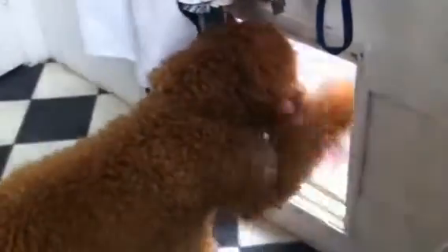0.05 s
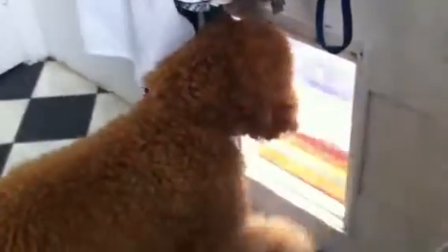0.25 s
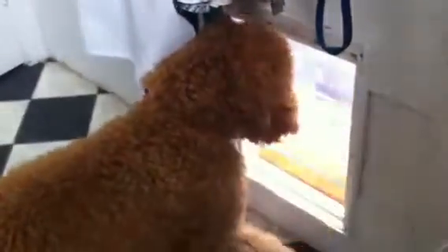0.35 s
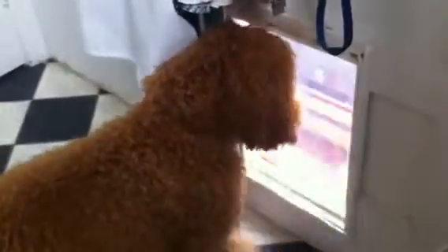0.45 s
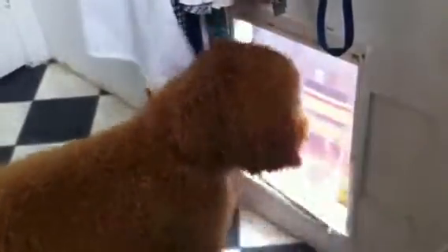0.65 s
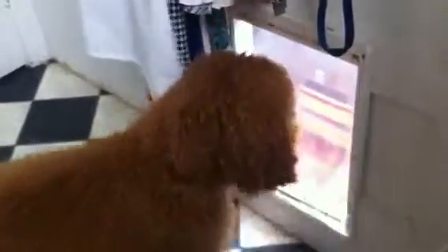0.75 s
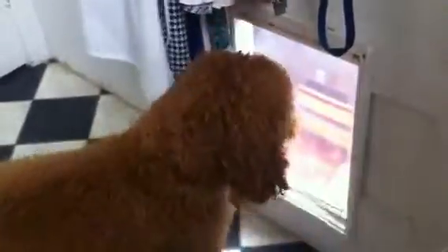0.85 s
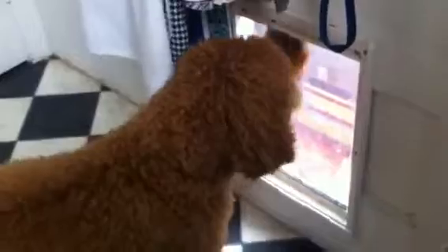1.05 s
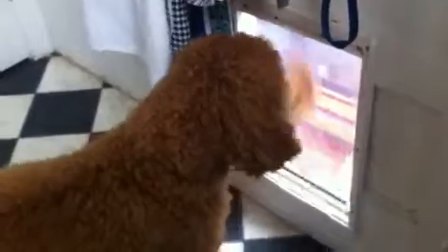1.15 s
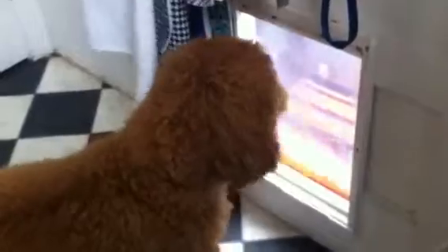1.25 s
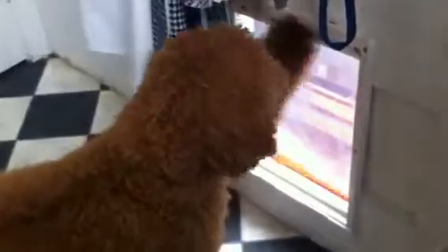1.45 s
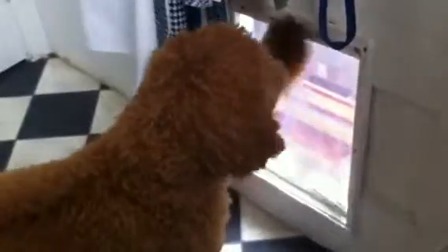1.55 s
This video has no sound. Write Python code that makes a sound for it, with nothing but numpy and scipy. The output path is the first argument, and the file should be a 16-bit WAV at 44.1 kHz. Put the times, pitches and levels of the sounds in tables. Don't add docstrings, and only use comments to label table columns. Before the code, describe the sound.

Sharp scratchy paw knocks on a thin plastic pet flap, with soft thumps and loose rattles indoors

```python
import sys
import numpy as np
from scipy import signal
from scipy.fft import rfft, irfft, next_fast_len
from scipy.io import wavfile
from scipy.ndimage import uniform_filter1d

SR = 44100
rng = np.random.default_rng(int(sys.argv[2]) if len(sys.argv) > 2 else 0)


def pcm_store(signal):
    levels = np.round(np.clip(np.atleast_2d(signal), -1, 1) * 32767)
    wavfile.write(sys.argv[1], SR, levels.astype(np.int16).T)


def voltage_ratio(level):
    return 10 ** (np.asarray(level, float) / 20)


N = 70560


def rms_one(x):
    return x / np.sqrt(np.mean(x ** 2) + 1e-20)


def at_hz(points, hz):
    table_hz, value = np.array(points).T
    return np.interp(np.log(hz), np.log(table_hz), value)


def filtered(x, order, hz, kind):
    return signal.sosfilt(signal.butter(order, hz, kind, fs=SR, output="sos"), x)


def bands(size, gain_at):
    edges = 22 * 2 ** np.arange(0, 9.9, .5)
    settle = 4000
    white = rng.standard_normal((2, size + settle))
    out = 0
    for k, (low, high) in enumerate(zip(edges, edges[1:])):
        band = filtered(white[k % 2], 2, [low, min(high, 20000)], "band")[settle:]
        out = out + gain_at(np.sqrt(low * high)) * band
    return out


def place(sounds):
    out = np.zeros(N + SR)
    for start_s, sound in sounds:
        start = int(start_s * SR)
        out[start:start + len(sound)] += sound
    return out[:N]


def ring(force, hz, t60):
    r = voltage_ratio(-60 / (max(t60, .002) * SR))
    w = 2 * np.pi * hz / SR
    return signal.lfilter([0, np.sin(w)], [1, -2 * r * np.cos(w), r * r], force + 1e-18)


def body(modes, force, spread_db):
    out = 0
    for hz, db, t60 in modes:
        luck, sign = rng.standard_normal(2)
        out = out + np.sign(sign) * voltage_ratio(db + spread_db * luck) * ring(force, hz, t60)
    return out


def near(modes, middle_hz, centre_oct, width_oct):
    chosen = []
    for hz, db, t60 in modes:
        distance = (np.log2(hz / middle_hz) - centre_oct) / width_oct
        chosen.append((hz, db - 6 * distance ** 2, t60))
    return chosen


def contact(length_ms):
    slips_per_ms, rise_share, first_slip = 13, .06, .8
    t = np.arange(4000) / SR * 1000 / np.clip(length_ms, .3, 12)
    chance, height = rng.random((2, 4000))
    slips = (chance < slips_per_ms * 1000 / SR) * (2 * height - 1)
    force = slips * (1 - np.exp(-t / rise_share)) * np.exp(-t)
    force[8] += first_slip
    tone = rfft(force)
    even = tone / np.sqrt(uniform_filter1d(np.abs(tone) ** 2, size=9) + 1e-9)
    force = irfft(even) * (t < 7)
    return force / np.sqrt(np.sum(force ** 2) + 1e-20)


# f/Hz, level/dB [dB per Hz]
FLOOR_COLOUR = [(15, -48), (25, -44), (60, -22), (120, -9), (249, -8), (344, -13), (988, -20.5),
                (3080, -25), (5280, -27.5), (9320, -29.5), (16000, -33)]


def room_noise():
    return voltage_ratio(-65) * rms_one(bands(N, lambda hz: voltage_ratio(at_hz(FLOOR_COLOUR, hz))))


def hum():
    hum_hz, width_hz = 218, 6
    return voltage_ratio(-69) * rms_one(ring(rng.standard_normal(N), hum_hz, 3.0 / width_hz))


# f/Hz, width [Hz], level/dB
CLAW_EDGE = [(3860, 1930, -5.5), (6440, 2430, 0.5), (7370, 1190, 3), (8660, 1270, 0.5), (11700, 3000, -5),
             (12690, 600, 3.5), (15200, 1700, -4.5)]


def crack(force):
    out = 0
    for k, (hz, width_hz, db) in enumerate(CLAW_EDGE):
        r = np.exp(-np.pi * width_hz / SR)
        top = [(1 - r * r) / 2, 0, (r * r - 1) / 2]
        bottom = [1, -2 * r * np.cos(2 * np.pi * hz / SR), r * r]
        out = out + (-1) ** k * voltage_ratio(db) * signal.lfilter(top, bottom, force)
    return out


# f/Hz, level/dB, t60 [s]
FLAP_MODES = [(1170, -5, .02), (1290, -6, .015), (1450, -8, .015), (1610, -5, .015), (1830, -3, .012),
              (2000, -2, .012), (2200, -3, .012), (2420, -4, .01), (2650, -2, .01), (2900, -2, .01),
              (3150, -3, .009), (3500, -5, .008), (3900, -5, .007), (4700, -8, .005)]


def snap(force, crack_db, centre_oct):
    modes = near(FLAP_MODES, 2000, centre_oct, width_oct=.5)
    thin = filtered(force, 2, 900, "high")
    ringing = body(modes, thin, spread_db=2.5)
    return voltage_ratio(24 + crack_db) * crack(force) + voltage_ratio(-2.5) * ringing


# t/s, peak level/dB, crack level/dB [re peak], contact [ms],
# ring centre [octaves re 2 kHz]
CLAW_STRIKES = [(0.0383, -41, -4.5, 3.2, 0.3), (0.2135, -33, -18.5, 3.5, -0.3), (0.218, -24, -4, 4.8, 0.18),
                (.3234, -26, -4.5, 3.2, .3), (.3460, -18.5, 7.5, 4.2, .5), (0.356, -25, 4.5, 1.1, .6),
                (0.627, -48, -30, 5.6, 0.33), (.342, -36, 0.5, 6.5, .5), (0.644, -32.5, -2.5, 8.3, 0.91),
                (0.6556, -30.5, -33, 3.9, 1), (0.665, -15, -2, 8.8, 0.76), (0.7847, -34, -3.5, 3.2, 0.4),
                (1.029, -32, -7.5, 11, 0.067), (1.0451, -19, -4, 1.8, .7), (1.3152, -28, -6, 1.6, .6),
                (1.382, -27, -10.5, 2.3, 0.2), (1.568, -38, -21.5, 11, 0.5),
                (1.5799, -20.5, -11, 3.9, 0.56)]


def strikes():
    sounds = []
    for s, db, crack_db, ms, centre_oct in CLAW_STRIKES:
        sounds.append((s, voltage_ratio(db) * snap(contact(ms), crack_db, centre_oct)))
    return place(sounds)


# t/s, level/dB, f/Hz, t60 [s]
CLAW_KNOCKS = [(0.0395, -34.5, 1880, 0.019), (.0384, -30.5, 2650, 0.007), (.040, -35.5, 2520, 0.018),
               (.039, -40.5, 573, 0.026), (0.064, -39, 2130, 0.0043), (0.069, -42.5, 306, 0.051),
               (.12, -43.5, 314, 0.066), (.2182, -28.5, 2750, 0.0097), (.219, -33.5, 1814, .02),
               (0.2147, -40, 1250, 0.013), (0.2176, -32, 2490, 0.028), (0.2189, -27, 1200, 0.03),
               (.2205, -27.5, 598, 0.025), (.238, -43, 3000, 0.009), (.255, -48, 626, .03),
               (.324, -27.5, 2790, 0.0066), (.3265, -33, 1900, .01), (.349, -37.5, 900, 0.043),
               (.347, -19.5, 1970, 0.035), (.347, -23.5, 3560, 0.041), (.628, -46, 2520, 0.023),
               (.748, -33, 2090, 0.016), (.79, -43, 708, 0.13), (.667, -35, 1140, 0.073),
               (.672, -31, 293, 0.045), (0.669, -37, 1600, .04), (.7855, -30, 2670, 0.012),
               (0.788, -40.5, 1200, 0.043), (1.0451, -24, 3170, .01), (1.0462, -27.5, 4000, 0.011),
               (1.05, -34, 593, 0.064), (1.053, -30, 1970, .02), (1.319, -41, 561, 0.11),
               (1.109, -25.5, 590, .015), (1.127, -30, 2080, 0.013), (1.3157, -25, 2950, 0.011),
               (1.335, -41, 2460, .015), (1.348, -28.5, 2550, 0.016), (1.346, -36, 1176, 0.048),
               (1.347, -36, 590, 0.027), (1.3825, -43, 2690, 0.023), (1.383, -36, 1193, 0.057),
               (1.411, -39, 2610, 0.035), (1.578, -50, 286, 0.07), (1.579, -37, 2100, 0.037)]


def knocks():
    longest_cycles = 45
    sounds = []
    for s, db, hz, t60 in CLAW_KNOCKS:
        force = np.zeros(8000)
        half = int(SR / hz / 2)
        force[:half] = np.sin(np.pi * np.arange(half) / half) * 2 / half
        sounds.append((s, voltage_ratio(db) * ring(force, hz, min(t60, longest_cycles / hz))))
    return place(sounds)


# f/Hz, level/dB, t60 [s]
PANEL_MODES = [(150, -8, .05), (215, -8, .05), (280, -3, .05), (345, -7, .04), (420, -7, .04),
               (500, -4, .04), (565, 0, .05), (620, -1, .045), (712, -5, .08), (790, -6, .035),
               (880, -5, .03), (990, -5, .03)]


def thump(force, centre_oct):
    modes = near(PANEL_MODES, 500, centre_oct, width_oct=.75)
    soft = signal.lfilter(*signal.butter(1, 774, fs=SR), force)
    return voltage_ratio(-13.5) * body(modes, soft, spread_db=2.5)


# t/s, level/dB, contact [ms], ring centre [octaves re 500 Hz]
PAD_THUMPS = [
    (.039, -42, 1.8, 0.083),
    (.2185, -21, 0.67, 0.84),
    (.327, -22, 1.6, 1),
    (.348, -38, 1.33, -0.63),
    (.668, -17, 16.6, -0.7),
    (.786, -24, 1.5, 0.55),
    (1.046, -20.5, 15, 0.32),
    (1.320, -45, 6.8, 0.77),
    (1.382, -19.5, 12, 0.82),
    (1.58, -69, 11, -1.14),
]


def thumps():
    return place([(s, voltage_ratio(db) * thump(contact(ms), centre_oct)) for s, db, ms, centre_oct in PAD_THUMPS])


# t/s, level/dB
AIR_PUSHES = [
    (.045, -66),
    (.255, -59),
    (.335, -69),
    (.675, -60),
    (0.786, -67),
    (1.044, -62),
    (1.125, -56),
    (1.32, -82),
    (1.38, -78),
    (1.59, -60),
]


def pushes():
    push_s = .0037
    out = np.zeros(N)
    for s, db in AIR_PUSHES:
        u = (np.arange(N) / SR - s) / push_s
        out += voltage_ratio(db) * u * np.exp(-u ** 2 / 2)
    return out


# t/s, length [s], hiss level/dB, rumble level/dB,
# swell [share of the length]
PAW_DRAGS = [(0.048, 0.03, -50, -52.5, 0.95), (0.082, 0.061, -64.5, -62.5, 0.24),
             (0.136, 0.074, -51.5, -63, 0.74), (0.226, 0.024, -44.5, -46, 0.48),
             (0.346, 0.028, -34.5, -46, 0.095), (0.632, 0.037, -56.5, -44.5, 1),
             (0.656, 0.042, -71, -43, 0.92), (1.028, 0.01, -43, -49, 0.3), (1.038, 0.06, -45.5, -45, 0.26),
             (1.108, 0.04, -56.5, -50, 0.54), (1.308, 0.043, -49.5, -46.5, 1),
             (1.383, 0.024, -68, -54.5, .4), (1.569, 0.024, -45, -56.5, 0.65)]


def drags():
    grains_per_s, spread_db, fall_s = 7000, 2, .009
    t = np.arange(N) / SR
    heights = voltage_ratio(spread_db * np.minimum(rng.exponential(1, N), 4))
    grains = (rng.random(N) < grains_per_s / SR) * heights * rng.choice([-1, 1], N)
    hiss, rumble = np.zeros(N), np.zeros(N)
    for s, length, hiss_db, rumble_db, rise in PAW_DRAGS:
        swell = np.clip((t - s) / (np.clip(rise, .05, 1) * length), 0, 1)
        stroke = swell * np.exp(-np.maximum(t - s - length, 0) / fall_s)
        hiss += voltage_ratio(hiss_db) * stroke
        rumble += voltage_ratio(rumble_db) * stroke
    panel = rms_one(body(PANEL_MODES, grains, 0))
    flap = rms_one(body(FLAP_MODES, grains, 0))
    return hiss * rms_one(crack(grains)) + rumble * (panel + voltage_ratio(3.5) * flap)


# t/s, peak level/dB, thump level/dB [re peak],
# crack level/dB [re peak], ring centre [octaves re 2 kHz]
FLAP_RATTLES = [(.0655, -39, 2.5, -4.5, 0.36), (.072, -41, 12.5, -3, 1), (0.082, -39.5, 5.5, -14, 0.9),
                (.1221, -39.5, 5.5, -14, 0.88), (0.239, -32, -40, -24, -0.26),
                (.255, -33.5, 2, -26.5, -0.52), (0.677, -21, -34, -19.5, -0.36), (.699, -48, -3, 10, 1),
                (.7467, -29.5, -5, -20, 1), (.752, -26.5, -5, -16, 1), (.800, -29, -7, -29, -0.31),
                (1.059, -37, 0, -36, 0.4), (1.082, -27, 0.5, -4, 1), (1.088, -28.5, 6.5, -3.5, -0.76),
                (1.0982, -34.5, 3, 1.5, 0.37), (1.109, -33.5, 2, -39, -0.71),
                (1.1261, -27.5, -9, -44, 0.93), (1.137, -32, -22, -22, 1), (1.256, -61, -3, -6, 0.15),
                (1.3354, -34, 6, -34.5, 0.55), (1.3458, -36, 1.5, -20, 0.3), (1.365, -32, -2.5, -18, 1),
                (1.398, -37, 4, -22, -0.33), (1.4106, -33.5, -15, -31, -0.8)]


def rattles():
    sounds = []
    for s, db, thump_db, crack_db, centre_oct in FLAP_RATTLES:
        force = contact(2.5)
        bump = snap(force, crack_db, centre_oct) + voltage_ratio(thump_db) * thump(force, .19)
        sounds.append((s, voltage_ratio(db) * bump))
    return place(sounds)


# f/Hz, t60 [s]
ECHO_T60 = [(150, 0.51), (500, 0.27), (1500, 0.27), (5500, 0.26), (12000, 0.25)]
# f/Hz, level/dB
ECHO_TONE = [(150, -15.5), (600, -5.5), (2000, -13.5), (3600, -12), (6000, -10.5), (14000, -22)]


def room(x):
    first_echo_s, build_s = .003, .004
    t = np.arange(SR // 2) / SR

    def fade(hz):
        t60 = at_hz(ECHO_T60, hz)
        return voltage_ratio(at_hz(ECHO_TONE, hz) - 60 * t / t60) / np.sqrt(t60 * SR / 14)

    tail = bands(len(t), fade) * np.clip((t - first_echo_s) / build_s, 0, 1)
    size = next_fast_len(N + len(t))
    tone = rfft(tail, size)
    power = np.abs(tone) ** 2 + 1e-20
    tone *= np.sqrt(uniform_filter1d(power, size=800) / uniform_filter1d(power, size=60))
    tail = irfft(tone, size)[:len(t)] * (t > first_echo_s)
    return irfft(rfft(x, size) * rfft(tail, size), size)[:N]


def scene():
    touches = strikes() + knocks() + thumps() + drags() + rattles()
    door = filtered(touches, 4, 129, "high")
    return (door + voltage_ratio(8.0) * room(door) + room_noise() + hum() + pushes())[None]


def top_cut(x):
    return signal.sosfilt(signal.butter(12, 16970, fs=SR, output="sos"), x)


# start t/s, end t/s, lost above f/Hz
TREBLE_GAPS = [(.029, .034, 2000), (.052, .055, 6000), (.307, .319, 4500), (.330, .341, 3600),
               (.632, .638, 5000), (.656, .661, 5500), (.772, .780, 9000), (1.027, 1.037, 10500),
               (1.0365, 1.041, 3500), (1.305, 1.311, 2300), (1.561, 1.565, 1500)]


def record(dry):
    x, t = dry.copy(), np.arange(N) / SR
    for start, end, hz in TREBLE_GAPS:
        low = signal.sosfiltfilt(signal.butter(6, hz, fs=SR, output="sos"), dry)
        gate = np.clip(np.minimum(t - start, end - t) / .0015 + 1, 0, 1)
        x = x + np.sin(gate * np.pi / 2) ** 2 * (low - dry)
    x = signal.sosfilt(signal.cheby2(8, 35, 16000, fs=SR, output="sos"), x)
    return top_cut(x)


dry = scene()
out = record(dry)
pcm_store(out)
```